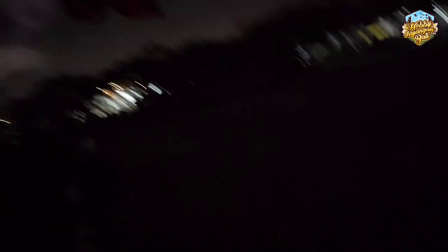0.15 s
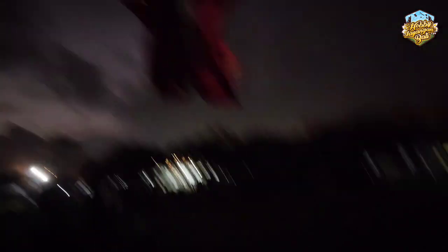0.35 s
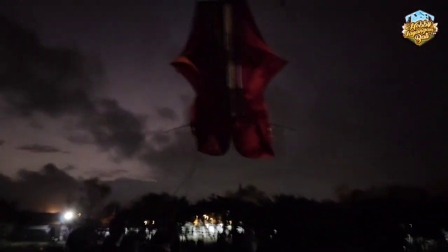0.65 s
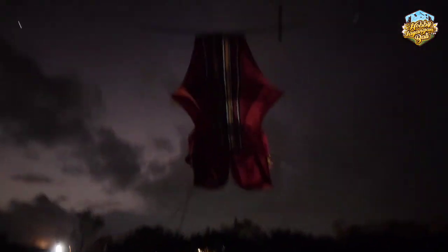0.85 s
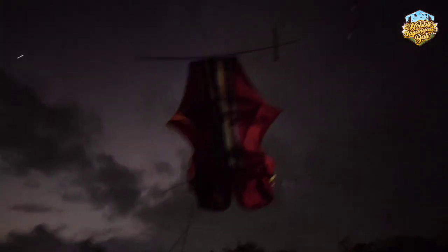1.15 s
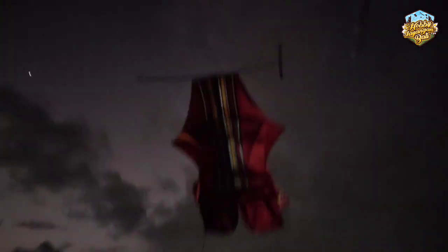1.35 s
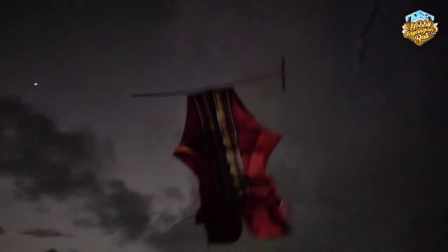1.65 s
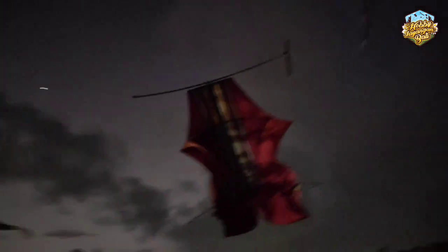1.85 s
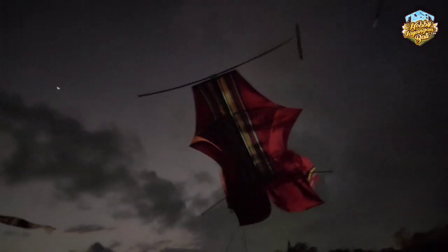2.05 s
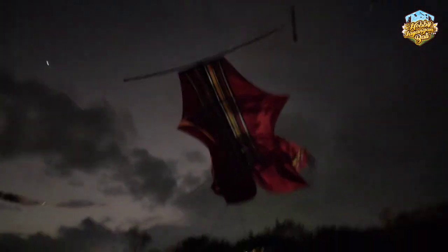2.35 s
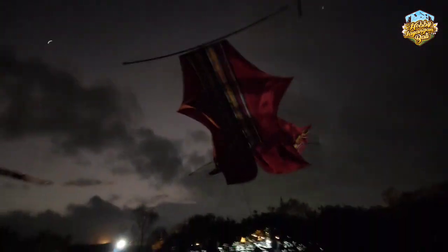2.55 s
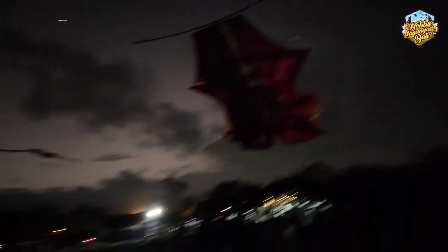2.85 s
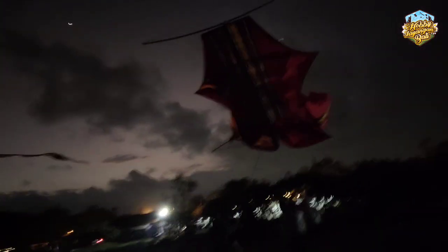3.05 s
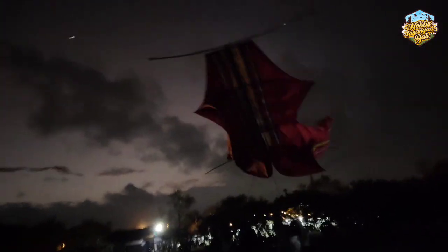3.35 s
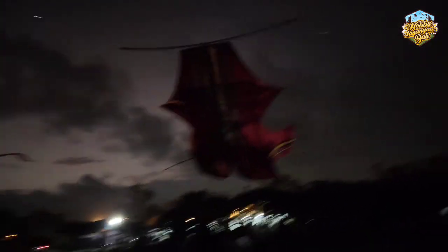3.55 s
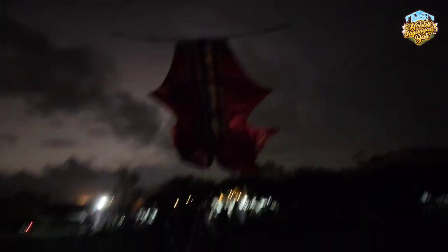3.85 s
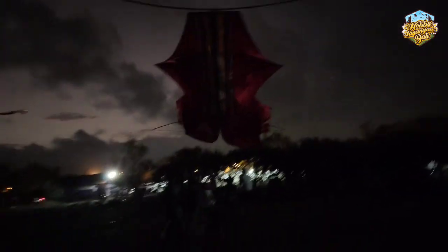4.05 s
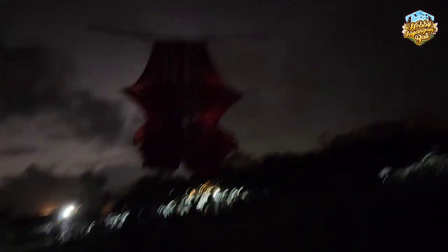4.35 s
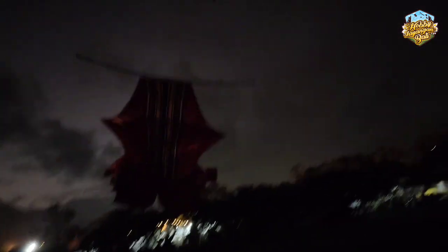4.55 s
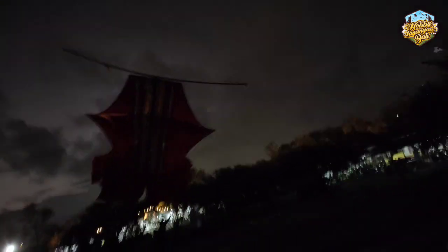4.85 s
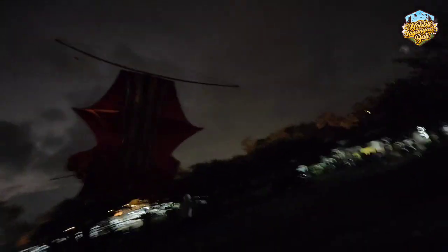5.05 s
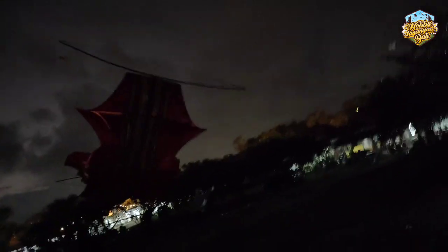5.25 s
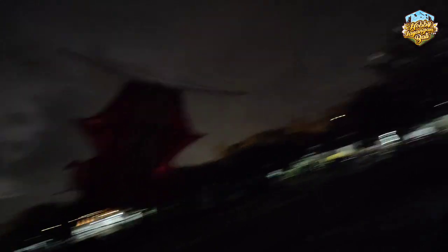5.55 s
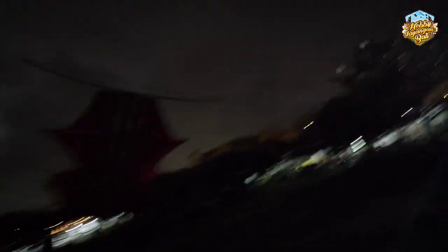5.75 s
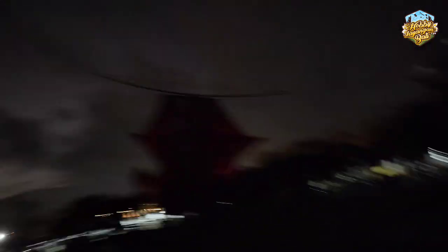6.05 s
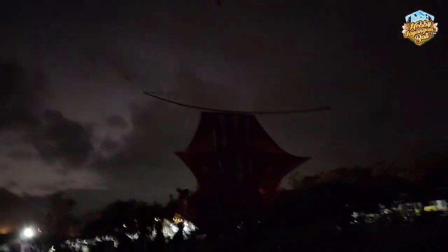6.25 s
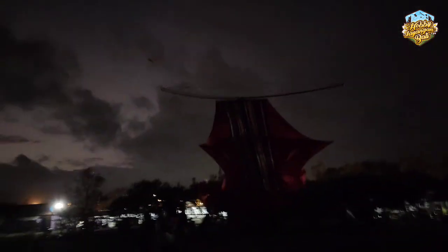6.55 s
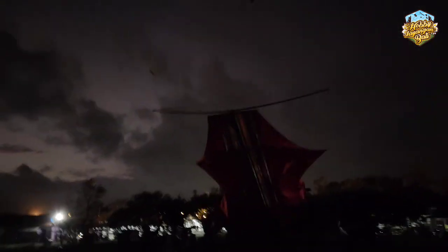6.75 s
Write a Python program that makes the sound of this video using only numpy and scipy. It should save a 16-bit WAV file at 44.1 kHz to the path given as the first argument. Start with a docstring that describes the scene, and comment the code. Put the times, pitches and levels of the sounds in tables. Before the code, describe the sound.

Outdoors at night in strong wind, a large kite's ribbon hummer drones overhead, throbbing about 27 times a second with a raspy, swishing edge. It sings on a fairly high, rough note, slackens around three seconds, returns lower and steadier, then almost fades near the end. Wind rumbles, sputters and pops on the handheld stereo microphone, cloth shivers faintly, and fingers click on the case.

```python
"""A windy beach at night: the ribbon of a large kite's bow hummer drones overhead.
The ribbon twists to and fro, so its tone, faint higher tones and swish throb about 27 times a second on a shifting pitch.
Filtered noise gives shivering cloth, rumble and sputtering gusts on two microphone ports, and a distant wash.
Eddies pop as pressure pulses; fingers click and rub on a case; two faint whistles arch in pitch."""
import sys
import numpy as np
from scipy import signal
from scipy.fft import rfft, irfft, next_fast_len
from scipy.io import wavfile
from scipy.ndimage import uniform_filter1d, map_coordinates

SR = 44100
rng = np.random.default_rng(int(sys.argv[2]) if len(sys.argv) > 2 else 0)


def inscribe(sig):
    """Save sig as 16-bit PCM at rate SR to the path in sys.argv[1].

    A 1-D sig is mono; a 2-D sig holds one channel per row.
    Samples are clipped to [-1, 1] before scaling.
    """
    pcm = np.round(np.clip(np.atleast_2d(sig).T, -1, 1) * 32767)
    wavfile.write(sys.argv[1], SR, pcm.astype(np.int16))


N = 304775
T = np.arange(N) / SR


def amp(db):
    """Decibels to gain."""
    return 10 ** (np.asarray(db) / 20)


def evened(x):
    """Scales to rms 1."""
    return x / np.sqrt(np.mean(x ** 2) + 1e-20)


def curves(rows):
    """Each column of a time table, interpolated at every sample."""
    s, *columns = np.transpose(rows)
    return [np.interp(T, s, c) for c in columns]


def butter(x, order, hz, kind="low"):
    """Causal Butterworth filter."""
    return signal.sosfilt(signal.butter(order, hz, kind, fs=SR, output="sos"), x)


def butter_zero_phase(x, order, hz, kind="low"):
    """Butterworth filter run forwards and backwards."""
    return signal.sosfiltfilt(signal.butter(order, hz, kind, fs=SR, output="sos"), x)


def colour(x, spectrum):
    """Minimum-phase filter from a (hz, rel_db) outline, keeping the power of white noise."""
    size = next_fast_len(N + 4096)
    hz, db = np.transpose(spectrum)
    log_hz = np.log(abs(np.fft.fftfreq(size, 1 / SR)) + 1)
    gain = evened(amp(np.interp(log_hz, np.log(hz), db)))
    response = np.exp(signal.hilbert(np.log(gain)).conj())[:size // 2 + 1]
    return irfft(rfft(x, size) * response, size)[..., :N]


def drift(width_hz):
    """Smooth random curve of rms 1 with a Gaussian spectrum width_hz wide."""
    size, rate_hz = 8192, 1000
    hz = np.fft.rfftfreq(size, 1 / rate_hz)
    slow = irfft(rfft(rng.standard_normal(size)) * np.exp(-(hz / width_hz) ** 2))
    return evened(np.interp(T * rate_hz, np.arange(len(slow)), slow))


def panned(balance_db):
    """Left and right gains for a left-minus-right level difference."""
    return amp(np.array([[balance_db], [-balance_db]]) / 2)


def swell(s, length_s):
    """A short rise and fall around the moment s."""
    return np.exp(-np.minimum(abs(2 * (T - s) / length_s) ** 1.5, 80))


def air(spectrum, shared, patchy_db):
    """Stereo noise with drifting patches of colour, partly common to both ports."""
    noise = rng.standard_normal((3, N))
    mixed = np.sqrt(shared) * noise[2] + np.sqrt(1 - shared) * noise[:2]
    bins = signal.stft(mixed, nperseg=1024)[2]
    patches = rng.standard_normal(bins.shape[1:])
    patches = uniform_filter1d(patches, size=4, axis=0)
    patches = uniform_filter1d(patches, size=12, axis=1)
    bins = bins * amp(patchy_db * np.minimum(evened(patches), 2))
    patched = signal.istft(bins, nperseg=1024)[1][:, :N]
    return colour(evened(patched), spectrum)


def off_the_ground(x, echo):
    """A grazing bounce off the sand returns inverted and combs the sound."""
    # delay shifts as the kite moves: start_s, delay_s
    delay_table = [(0, .00212), (.6, .00222), (.9, .00216), (1.35, .00218), (1.9, .0021), (2.45, .00192),
                   (3.0, .00199), (3.4, .00238), (4.05, .0022), (4.75, .0027), (5.2, .00242), (5.8, .00237),
                   (6.2, .00285), (6.91, .0027)]
    late_s = T - curves(delay_table)[0]
    bounced = np.array([map_coordinates(port, [late_s * SR], order=3) for port in x])
    return (x - echo * bounced) / np.hypot(1, echo)


def twisting():
    """Twists of the ribbon counted from the start, with a little wander."""
    # full twists, two throbs each: start_s, twists_per_s
    twist_table = [(0.0, 12.415), (0.1, 14.101), (0.6, 13.361), (0.7, 13.862), (1.1, 13.629), (1.2, 14.005),
                   (1.4, 13.246), (3.0, 13.757), (3.2, 13.457), (4.2, 13.366), (4.9, 13.441), (5.1, 13.222),
                   (5.4, 13.555), (5.8, 12.844), (6.0, 13.883), (6.5, 12.991), (6.9, 13.529)]
    wander_twists = 0.0054
    return np.cumsum(curves(twist_table)[0]) / SR + wander_twists * drift(33)


def throb(twist, lead, depth_db, flat_db, snap_db):
    """Two swells per twist as the ribbon turns through the wind; lead is in throb cycles.

    flat_db broadens the crest, snap_db speeds the rise."""
    angle = 2 * np.pi * (2 * twist + lead)
    swell_db = depth_db * np.cos(angle) - flat_db * np.cos(2 * angle) - snap_db * np.sin(2 * angle)
    return evened(amp(swell_db))


def ribbon_phase(twist, hz, unsteady):
    """The pitch holds high and climbs through each throb, and sags between throbs."""
    # pitch deviations as fractions of hz
    swing, sag, climb = 0.03, 0.03, 0.027
    wobble, flutter = 0.013, 0.02195
    angle = 2 * np.pi * (2 * twist + 0.018)
    bend = swing * (np.cos(angle) - 0.45) - sag * np.cos(2 * angle) + climb * np.sin(angle)
    # least steady in the troughs
    waver = wobble * drift(18.33) + flutter * (1 - 0.728 * np.cos(angle)) * drift(69.4)
    return 2 * np.pi * np.cumsum(hz * (1 + bend + unsteady * waver)) / SR


def ribbon_tone(twist, phase, unsteady):
    """Throbbing fundamental and octave; so thin a ribbon radiates no bass."""
    # octave against fundamental: start_s, rel_db
    octave_table = [(0, -6.5), (.4, -13.5), (1.0, -12.5), (2.05, -9.5), (2.65, -19.5), (3.1, -13.5),
                    (3.35, -3), (3.95, 3), (4.15, -10.5), (4.35, -7), (4.8, -13.5), (5.3, -4.5), (5.9, -10),
                    (6.25, -23)]
    shake_db, octave_multiple = 1.54, 2.02
    # rough flutter broadens the throbs and fills the gaps between them
    broad = unsteady - 0.7
    swells = throb(twist, lead=0.044, depth_db=8.7 - 1.2 * broad, flat_db=0.6 + 1.1 * broad, snap_db=1)
    tone = np.sin(phase) * swells * amp(unsteady * shake_db * drift(120))
    tone = butter_zero_phase(tone, 4, 175, "high")
    octave = np.sin(octave_multiple * phase + 0.71 * drift(47))
    octave *= throb(twist, lead=0.085, depth_db=10, flat_db=1.4, snap_db=0.8)
    return tone + amp(curves(octave_table)[0] + 1.1 * unsteady * drift(30)) * octave


def higher_tones(twist, phase):
    """A third partial and faint higher tones, at multiples that are not whole numbers."""
    # third partial: start_s, rel_db
    third_table = [(0, -13), (1.1, -18), (2.2, -17.5), (2.7, -12.5), (3.2, -26), (3.9, -13.5), (4.35, -11),
                   (5.0, -15.5), (5.8, -14), (6.25, -27.5)]
    # higher tones: multiple, rel_db
    higher_table = [(4.1, -31.5), (5.2, -35), (7.8, -35), (9.4, -40.5)]
    third_multiple, smear_rad = 3.24, 0.07
    third = amp(curves(third_table)[0]) * np.sin(third_multiple * (phase + smear_rad * drift(78)))
    third *= throb(twist, lead=0.03, depth_db=8, flat_db=-1, snap_db=3)
    upper = sum(amp(db) * np.sin(k * phase + smear_rad * k * drift(72)) for k, db in higher_table)
    upper = upper * throb(twist, lead=0.22, depth_db=7, flat_db=-2.5, snap_db=7)
    return (third + upper) * panned(1.2)


def ribbon_swish(twist, phase, hz):
    """Air noise chopped by each swing of the ribbon, growing with its pitch."""
    # spectrum: hz, rel_db
    swish_table = [(140, -32.5), (300, 23.5), (600, 15), (1000, -1.5), (1800, -5), (2600, -4.5), (3400, -2),
                   (4500, -22), (6000, -34), (9000, -32.5), (15000, -35.5)]
    swish_db, pitch_power = -15, 3.9
    noise = air(swish_table, shared=0.58, patchy_db=2) * evened(1 + 0.8 * np.cos(phase))
    noise = noise * throb(twist, lead=0.14, depth_db=10, flat_db=0.8, snap_db=3)
    return amp(swish_db) * (hz / hz.mean()) ** pitch_power * noise * panned(1.9)


def hummer(twist):
    """The ribbon's tone swells and bends with every twist; its rasp throbs in the same rhythm."""
    # sings high, slackens, catches again lower, dies away: start_s, base_pitch_hz, base_level_db
    hum_table = [(0, 324, -26), (.45, 316, -23.5), (1.2, 322, -19), (1.6, 313, -23.5), (2.1, 308, -23),
                 (2.5, 315, -26), (2.8, 335, -25), (3.08, 349, -28.5), (3.22, 332, -40), (3.32, 255, -40),
                 (3.55, 242, -33), (3.88, 272, -35), (4.3, 266, -28.5), (4.95, 283, -27),
                 (5.25, 266, -24.5), (5.5, 278, -24.5), (5.8, 249, -22.5), (6.02, 277, -24.5),
                 (6.15, 277, -25.5), (6.3, 272, -36), (6.6, 268, -51), (6.91, 275, -40)]
    # rough on the high note, more even on the low one: start_s, unsteadiness (1 = usual)
    unsteady_table = [(0, 1.5), (1.5, 1.3), (3.2, 1.1), (4.4, 1.2), (5.2, .7), (6.1, .7), (6.4, 1.2)]
    # rasp against the ribbon's strength: start_s, rel_db
    rasp_table = [(0, 2), (.3, -0.5), (.6, 0), (1.0, 1.5), (1.3, 1), (1.6, -3.5), (1.85, 0), (2.3, 1),
                  (2.9, 0.5), (3.5, 6.5), (3.9, 10), (4.4, 3.5), (4.9, 3), (5.6, 1), (6.1, 2.5), (6.4, 0)]
    uneven_db, lopsided_db, limp_twists = 1.45, -0.6, 0.027
    edge_db, edge_follows = -15.5, 0.65
    hz, level_db = curves(hum_table)
    unsteady = curves(unsteady_table)[0]
    phase = ribbon_phase(twist, hz, unsteady)
    # the halves of a twist differ in strength and in length
    half = np.cos(2 * np.pi * twist)
    strength = amp(level_db + unsteady * uneven_db * np.tanh(drift(27)) + lopsided_db * half)
    twist = twist + limp_twists * half
    tone = strength * ribbon_tone(twist, phase, unsteady) * panned(0)
    # higher tones and swish fade less than the fundamental when the ribbon slackens
    edge = strength ** edge_follows * amp(edge_db + curves(rasp_table)[0] + unsteady * drift(26))
    rasp = edge * (higher_tones(twist, phase) + ribbon_swish(twist, phase, hz))
    return off_the_ground(tone, echo=0.43) + off_the_ground(rasp, echo=0.62)


def rustle(twist):
    """Cloth shivers in brief, grainy noise puffs that pulse with the ribbon."""
    # puffs: centre_s, length_s, rel_db
    rustle_table = [(2.524, 0.72, -48.5), (2.912, 0.13, -53.5), (3.213, 0.14, -48), (3.8, 0.4, -50.5),
                    (4.13, 0.11, -54), (4.39, 0.11, -45), (4.686, 0.17, -48), (4.872, 0.16, -45),
                    (5.054, 0.34, -46.5), (5.302, 0.074, -47), (5.385, 0.055, -40.5), (5.465, 0.12, -48.5),
                    (5.78, 0.017, -40.5), (5.841, 0.074, -45), (5.955, 0.086, -47.5), (6.064, 0.063, -46.5),
                    (6.149, 0.0093, -38), (6.592, 0.055, -46), (6.69, 0.06, -44.5), (6.886, 0.086, -50)]
    # spectrum: hz, rel_db
    cloth_table = [(200, -24.5), (700, -0.5), (1000, 6), (1450, 7), (2200, 1.5), (3200, -3.5), (4500, -24),
                   (8000, -38), (15000, -53)]
    stir = sum(amp(db) * swell(s, length_s) for s, length_s, db in rustle_table)
    grain = amp(2.5 * np.tanh(drift(200)))
    pulse = throb(twist, lead=0.24, depth_db=2.5, flat_db=1.5, snap_db=3)
    cloth = evened(air(cloth_table, shared=0.36, patchy_db=0.5) * grain)
    return stir * pulse * cloth * panned(2)


def gusts():
    """Power of the rumble and of the sputter that the gusts bring to each port."""
    # centre_s, length_s, rumble_rel_db, sputter_rel_db, port (0 left, 1 right)
    gust_table = [(0.065, 0.012, -29, -36, 0), (0.121, 0.037, -40, -37.5, 0), (0.188, 0.0035, -25, -32, 0),
                  (0.593, 0.047, -24, -40.5, 1), (0.701, 0.038, -22.5, -42, 1),
                  (0.853, 0.035, -30, -34.5, 0), (1.298, 0.014, -42, -37.5, 0),
                  (1.374, 0.086, -21, -50.5, 1), (1.675, 0.049, -28, -32.5, 0),
                  (1.748, 0.063, -23, -35.5, 1), (2.008, 0.072, -18, -34.5, 1),
                  (2.067, 0.069, -23, -31.5, 1), (2.098, 0.057, -22, -31.5, 0),
                  (2.221, 0.016, -19.5, -29, 1), (2.296, 0.03, -24, -33, 0), (2.723, 0.084, -23, -86.5, 1),
                  (2.956, 0.037, -29.5, -43, 1), (3.109, 0.025, -51, -35.5, 0),
                  (3.421, 0.0084, -28, -42, 1), (3.648, 0.016, -45, -26, 0), (3.742, 0.027, -46, -31, 0),
                  (3.781, 0.037, -46, -32.5, 0), (3.991, 0.015, -26, -35, 0), (3.83, 0.035, -27, -40.5, 1),
                  (3.945, 0.048, -24, -38.5, 1), (4.024, 0.014, -30, -23.5, 0),
                  (4.025, 0.073, -21, -40.5, 1), (4.508, 0.094, -20.5, -33, 1),
                  (4.524, 0.0084, -31, -30, 1), (4.9, 0.018, -25, -34.5, 0), (5.2, 0.062, -26, -49, 1),
                  (5.567, 0.044, -24.5, -53, 1), (6.186, 0.06, -24, -65, 1), (6.405, 0.021, -21.5, -39, 1),
                  (6.462, 0.043, -19, -34, 1), (6.508, 0.021, -25, -38, 1), (6.665, 0.018, -32, -41, 0),
                  (6.757, 0.0072, -28, -52, 1), (6.845, 0.031, -29.5, -39.5, 0),
                  (6.89, 0.021, -33, -38.5, 0)]
    wake_db, wake_extra_s = -17.5, 0.031
    low, sputter = np.zeros((2, 2, N))
    for s, length_s, rumble_db, sputter_db, port in gust_table:
        # each gust travels inside a longer, weaker patch of rough air
        shape = swell(s, length_s) + amp(wake_db) ** 2 * swell(s, length_s + wake_extra_s)
        low[round(port)] += amp(rumble_db) ** 2 * shape
        sputter[round(port)] += amp(sputter_db) ** 2 * shape
    return low, sputter


def turbulence(gust_power):
    """Strength of the air at each port: restless steady wind plus the gusts, added as power."""
    # steady wind with two deep lulls: start_s, rel_db
    wind_table = [(0, -32), (.08, -38.5), (.2, -29), (.27, -44), (.38, -35.5), (.5, -34), (.7, -31),
                  (.77, -42.5), (.9, -24.5), (1.0, -42), (1.07, -66.5), (1.23, -67), (1.29, -43),
                  (1.38, -33), (1.5, -40), (1.62, -32.5), (1.85, -31.5), (2.0, -31), (2.3, -24.5),
                  (2.42, -39), (2.55, -35.5), (2.75, -36.5), (2.87, -37.5), (2.97, -32.5), (3.08, -40),
                  (3.2, -34.5), (3.5, -34.5), (3.7, -33.5), (3.9, -33.5), (4.15, -39.5), (4.4, -29),
                  (4.6, -42), (4.77, -31.5), (4.88, -35.5), (5.05, -32.5), (5.17, -35), (5.27, -50.5),
                  (5.48, -45), (5.56, -39.5), (5.75, -36), (5.85, -40.5), (6.1, -36), (6.33, -40),
                  (6.5, -33.5), (6.65, -30.5), (6.78, -34), (6.91, -34)]
    restless_db, balance_db = 3.5, -2.5
    restless = restless_db * np.tanh([drift(20), drift(5.6)])
    steady = amp(curves(wind_table)[0] + restless) * panned(balance_db)
    return np.sqrt(steady ** 2 + gust_power)


def rumble(wind):
    """Lumpy low noise from separate turbulence at each port."""
    # spectrum: hz, rel_db
    rumble_table = [(20, -41), (35, -33), (52, -30.5), (80, -7), (110, -2), (160, -2.5), (230, -5.5),
                    (400, -10.5), (650, -27.5), (1000, -31), (2000, -66.5), (5000, -83)]
    rumble_db, lumpy_db = 2.5, 4
    lumps = amp(lumpy_db * np.array([drift(47), drift(37)]))
    return amp(rumble_db) * wind * evened(colour(rng.standard_normal((2, N)) * lumps, rumble_table))


def blasts(wind, sputter_power):
    """Gusts break into eddies that sputter on a port: a rough roar and a string of small crackles."""
    # spectrum: hz, rel_db
    blast_table = [(15, -69.5), (45, -34), (100, -3.5), (250, -2), (500, 9.5), (750, 2), (1000, -5),
                   (1400, -19), (2000, -26), (3000, -51), (5000, -59), (12000, -71.5)]
    blast_db, eddy_db, roughness_db, spill_db = 10, 4, 8.5, -23
    crackles_per_s = 500
    eddies = amp(eddy_db * np.tanh([drift(85), drift(54)]))
    # strong turbulence sputters a little by itself
    force = np.sqrt(sputter_power) * eddies * amp(blast_db) + amp(spill_db) * wind
    roughness = amp(roughness_db * np.array([drift(490), drift(170)]))
    roar = evened(rng.standard_normal((2, N)) * roughness)
    struck = rng.random((2, N)) < crackles_per_s / SR
    crackle = evened(rng.standard_normal((2, N)) * struck)
    sound = colour(roar + crackle, blast_table)
    # level evened over 1000 samples
    return force * sound / np.sqrt(uniform_filter1d(sound ** 2, size=1000) + 1e-9)


def bright_roars():
    """Some gusts carry a dense, brighter roar, made of grainy noise."""
    # centre_s, length_s, level_db, left_minus_right_db
    roar_table = [(0.1, .04, -43, 10), (1.668, 0.052, -44, 7), (1.75, .05, -40.5, 0),
                  (1.995, 0.037, -44.5, -16), (2.059, 0.047, -34, 6), (2.23, 0.037, -40.5, -10),
                  (4.516, 0.15, -44.5, -4), (6.456, 0.047, -52, -5)]
    # spectrum: hz, rel_db
    roar_spectrum = [(300, -6.5), (800, 3), (1500, 1), (2100, -12.5), (2800, -17.5), (4500, -37),
                     (12000, -57.5)]
    rough_db = -2
    force = sum(amp(db) * swell(s, length_s) * panned(balance_db)
                for s, length_s, db, balance_db in roar_table)
    grain = amp(rough_db * np.array([drift(300), drift(300)]))
    return force * evened(colour(rng.standard_normal((2, N)) * grain, roar_spectrum))


def pops():
    """An eddy slaps a port: a push of pressure, its rebound, and a short puff of rough air."""
    # start_s, peak_rel_db, left_minus_right_db, top_hz, puff_decay_s
    pop_table = [(0.066, -9, 17, 950, 0.0036), (0.081, -10.5, 24, 1080, 0.0017),
                 (0.089, -12, 21, 1410, 0.00085), (0.1044, -3.5, 33, 1510, 0.0015),
                 (0.113, -25, 15, 1400, .002), (0.745, -20, 1, 1290, .003), (0.832, -26, 13, 1000, 0.003),
                 (0.891, -20, 16, 1400, 0.0018), (1.695, -18, 10, 1110, 0.0022),
                 (1.74, -14.5, 2, 1180, 0.0032), (1.868, -13.5, 2, 900, 0.0037),
                 (1.972, -10, -7, 597, .003), (2.005, -5.5, -19, 1430, 0.00084),
                 (2.028, -10, -20, 1650, 0.00069), (2.074, -9, -1, 1400, 0.0042),
                 (2.112, -8.5, -11, 1180, .006), (2.215, -16.5, -24, 1300, 0.0038),
                 (2.295, -15, 15, 1470, 0.0035), (3.404, -16, -13, 1110, 0.004),
                 (3.643, -8.5, 23, 1630, 0.0023), (3.669, -9.5, 15, 1080, 0.0044),
                 (3.74, -14, 14, 1290, .003), (3.774, -14.5, 17, 1480, 0.004),
                 (3.902, -10, -13, 940, 0.0072), (3.917, -12, -11, 1080, 0.00093),
                 (4.014, -12, 2, 1270, 0.004), (4.021, -11.5, 4, 1040, 0.0026),
                 (4.049, -13.5, -11, 1090, 0.0071), (4.462, -15, -20, 1170, 0.0066),
                 (4.524, -9.5, -22, 1430, 0.0029), (6.371, -16.5, -27, 940, 0.0031),
                 (6.401, -15, -22, 920, 0.0017), (6.445, -8, -19, 610, .003),
                 (6.472, -7.5, 19, 955, 0.0054), (6.603, -14, 24, 1250, 0.0054)]
    pop_db, puff_db, push_s, lowest_hz = -4.5, 2, 0.0011, 110
    out = np.zeros((2, N))
    t = np.arange(2048) / SR
    push = (1 - t / push_s) * np.exp(-t / push_s)
    for s, db, balance_db, top_hz, puff_s in pop_table:
        puff = amp(puff_db) * rng.standard_normal((2, len(t))) * np.exp(-t / puff_s)
        pop = butter(push + puff, 5, top_hz)
        pop = butter(pop, 2, lowest_hz, "high")
        pop = pop / abs(pop).max(axis=1, keepdims=True)
        ports = panned(balance_db)
        start = round(s * SR)
        out[:, start:start + len(t)] += (amp(pop_db + db) * ports / ports.mean() * pop)[:, :N - start]
    return out


def handling():
    """Fingers click and slide on a case: decaying noise clicks and short noise rubs."""
    # clicks: start_s, rel_db, left_minus_right_db, t60_s
    click_table = [(0.104, -37, 14, 0.0027), (1.973, -56.5, -10.5, 0.0076), (3.644, -52, 12, 0.0068),
                   (4.675, -56, 3, 0.0084), (6.113, -50, 3, 0.0052), (6.2004, -44, 2, 0.028),
                   (6.215, -44, 5, 0.022), (6.4447, -57, -2, 0.011)]
    # rubs: centre_s, length_s, level_db
    rub_table = [(0.057, 0.0086, -46.5), (6.596, 0.04, -54.5), (6.615, 0.0065, -50)]
    # click spectrum: hz, rel_db
    case_table = [(500, -30), (2000, -8), (4000, 6), (6800, 2), (9000, -8.5), (13000, -15.5), (15500, -22)]
    # rub spectrum: hz, rel_db
    skin_table = [(1000, -18.5), (3000, -3.5), (6500, 5.5), (9000, -1), (13000, -4), (15500, -12)]
    click_db = 8
    touch = np.zeros((2, N))
    for s, db, balance_db, t60_s in click_table:
        decay_db = -60 * np.minimum(abs(T - s) / t60_s, 3)
        touch += panned(balance_db) * (T >= s) * amp(click_db + db + decay_db)
    slide = sum(amp(db) * swell(s, length_s) for s, length_s, db in rub_table)
    clicks = colour(touch * rng.standard_normal((2, N)), case_table)
    return clicks + colour(slide * rng.standard_normal((2, N)), skin_table)


def thin_tone(s, length_s, top_hz, droop_hz, db):
    """A faint whistling line that arches in pitch, fuzzed by random modulation."""
    width_hz, fuzz = 55, 0.73
    hz = top_hz - droop_hz * np.minimum((2 * (T - s) / length_s) ** 2, 2)
    shimmer = 1 + fuzz * (drift(width_hz) + 1j * drift(width_hz))
    line = (shimmer * np.exp(2j * np.pi * np.cumsum(hz) / SR)).real
    return amp(db) * swell(s, length_s) * evened(line)


def whistles():
    """Faint thin whistles, the same at both ports."""
    # centre_s, length_s, top_pitch_hz, end_droop_hz, level_db
    whistle_table = [(5.11, 0.48, 1532, 72, -48.5), (6.693, 0.13, 6760, 15, -61)]
    return sum(thin_tone(*row) for row in whistle_table)


def wash(twist):
    """Hiss of wind over cloth and shore, pulsing with the ribbon; the fizz swells more than the body."""
    # swelling and sinking treble: start_s, rel_db
    wash_level_table = [(0, -49), (.06, -56.5), (.18, -63.5), (.32, -56.5), (.45, -62.5), (.75, -62.5),
                        (.86, -59), (.97, -65.5), (1.06, -59.5), (1.42, -66), (1.55, -65), (1.68, -69),
                        (1.8, -62), (2.1, -78.5), (2.2, -63.5), (2.3, -68), (2.45, -57), (2.65, -58.5),
                        (2.8, -68), (2.92, -61.5), (3.02, -65), (3.18, -58), (3.42, -68), (3.6, -62),
                        (3.75, -62.5), (3.9, -65.5), (4.06, -74), (4.1, -58), (4.18, -61), (4.28, -72),
                        (4.38, -68), (4.5, -80), (4.68, -61.5), (4.76, -64.5), (4.88, -59.5), (5.2, -68.5),
                        (5.4, -58), (5.57, -68.5), (5.7, -63), (5.95, -61), (6.15, -58.5), (6.3, -59.5),
                        (6.5, -68), (6.6, -63), (6.71, -58.5), (6.8, -76), (6.86, -62)]
    # spectrum: hz, rel_db
    wash_table = [(40, -27), (150, 0), (500, -6), (900, -14), (1500, 8.5), (2100, -0.5), (3100, -5.5),
                  (4200, -10), (5500, -12.5), (7000, -17.5), (8500, -21), (11000, -24.5), (14000, -27.5),
                  (15700, -41)]
    wash_db, flicker_db = 11, 1.7
    body_db, body_follows = -34.5, 0.62
    level_db = curves(wash_level_table)[0] + flicker_db * drift(45)
    noise = air(wash_table, shared=0.17, patchy_db=1.5)
    low = butter_zero_phase(noise, 2, 2300)
    top = butter_zero_phase(noise, 3, 7500, "high")
    middle = noise - low - top
    body = amp(body_db + body_follows * level_db) * off_the_ground(low, echo=1) * panned(1.5)
    fizz = amp(level_db) * (middle * panned(8.1) + top * panned(-2.9))
    fizz = off_the_ground(fizz, echo=0.43)
    fizz = fizz * throb(twist, lead=0.15, depth_db=1, flat_db=0.2, snap_db=0.4)
    return amp(wash_db) * (body + fizz)


def scene():
    """Kite, wind, fingers and shore at the two ports."""
    twist = twisting()
    gust_power, sputter_power = gusts()
    wind = turbulence(gust_power)
    kite = hummer(twist) + off_the_ground(rustle(twist), echo=0.39)
    weather = rumble(wind) + blasts(wind, sputter_power) + bright_roars() + pops()
    return kite + weather + handling() + whistles() + wash(twist)


def record(dry):
    """The microphone rounds off the hardest peaks; then a linear-phase low-pass limits the band."""
    ceiling, edge_hz = 0.7, 15700
    rounded = dry / (1 + (dry / ceiling) ** 4) ** (1 / 4)
    low_pass = signal.firwin(511, edge_hz, window=("kaiser", 9), fs=SR)
    return signal.oaconvolve(rounded, low_pass[None], "same", axes=1)


dry = scene()
out = record(dry)
inscribe(out)
```